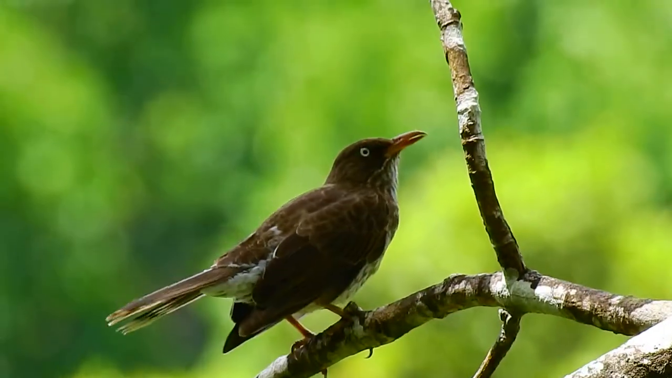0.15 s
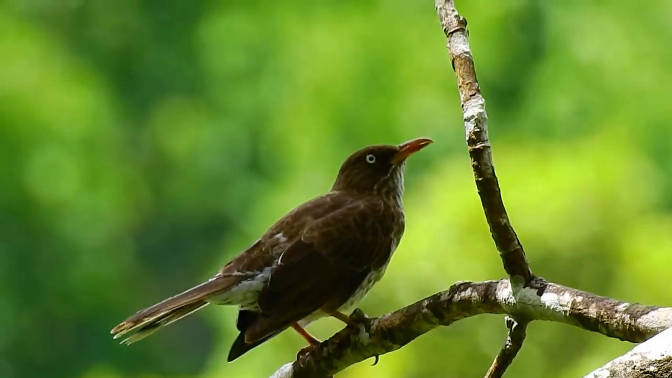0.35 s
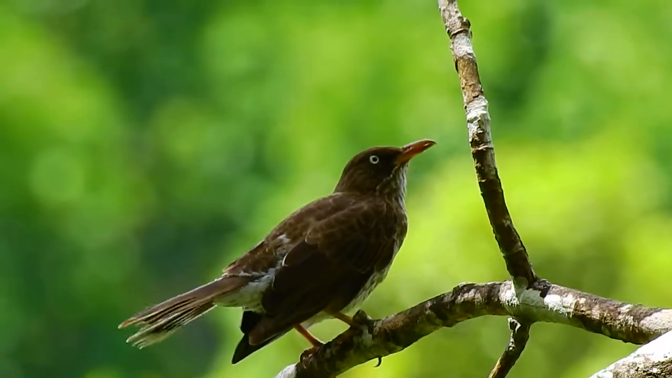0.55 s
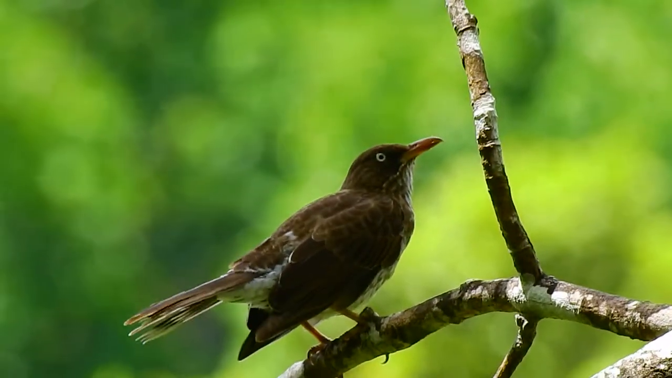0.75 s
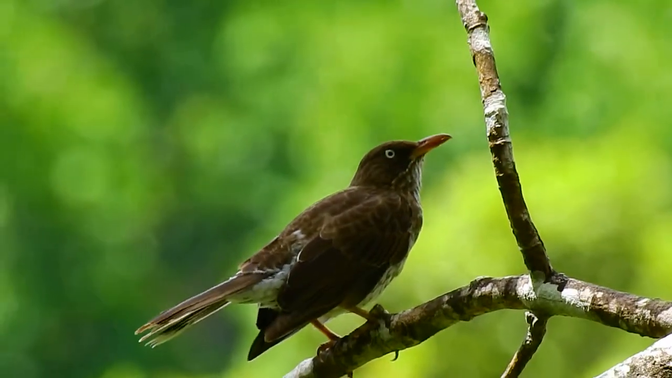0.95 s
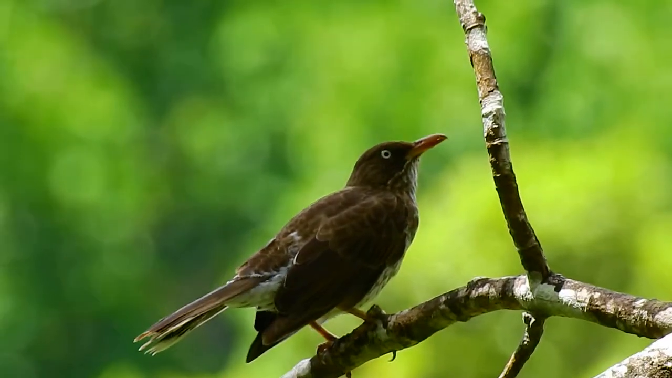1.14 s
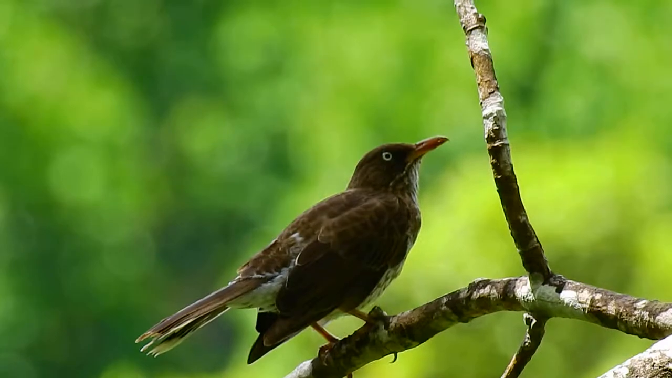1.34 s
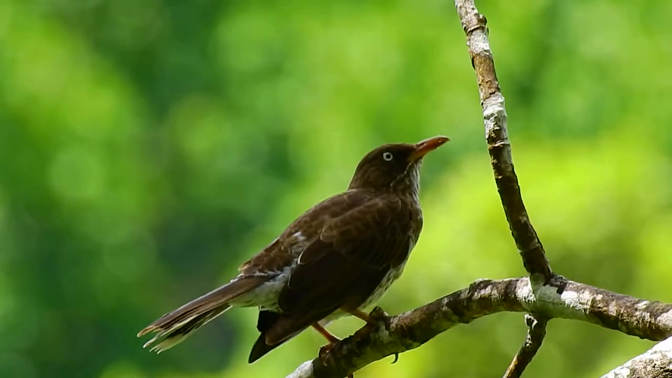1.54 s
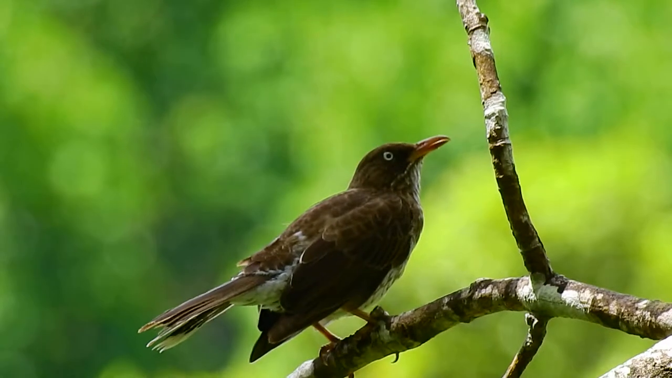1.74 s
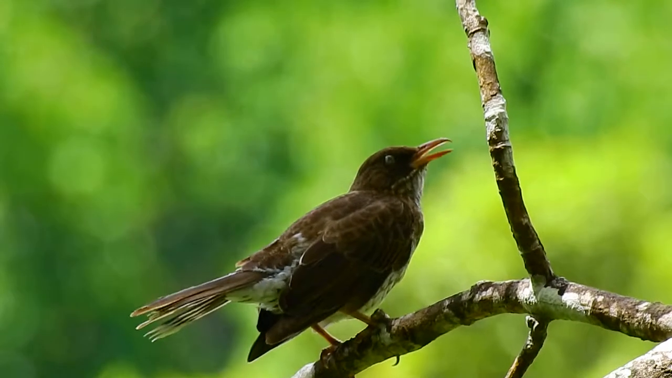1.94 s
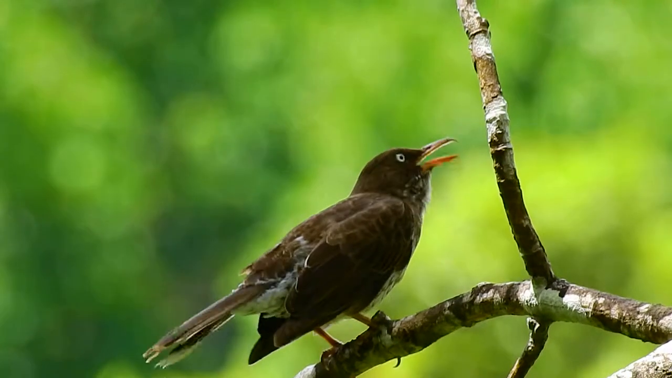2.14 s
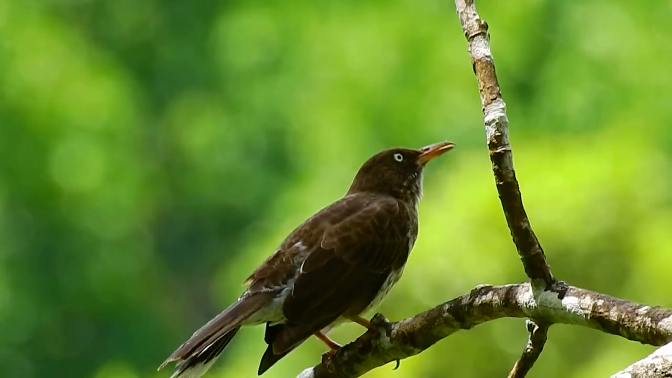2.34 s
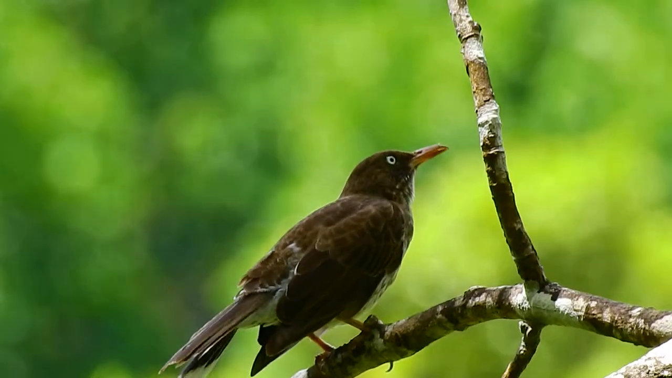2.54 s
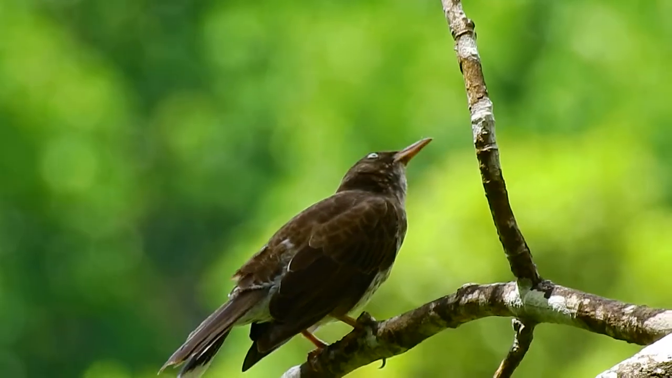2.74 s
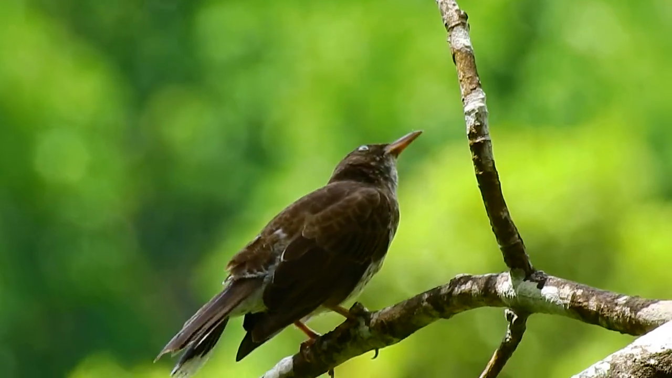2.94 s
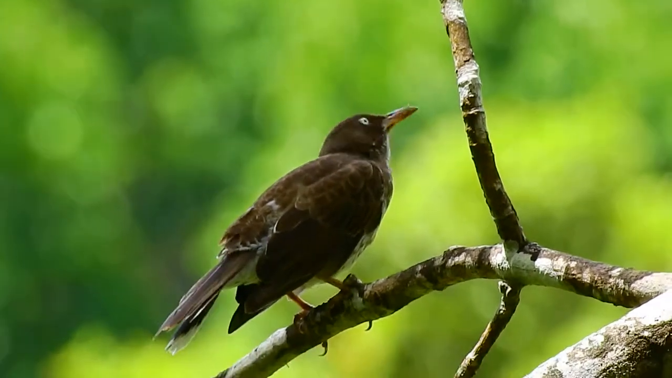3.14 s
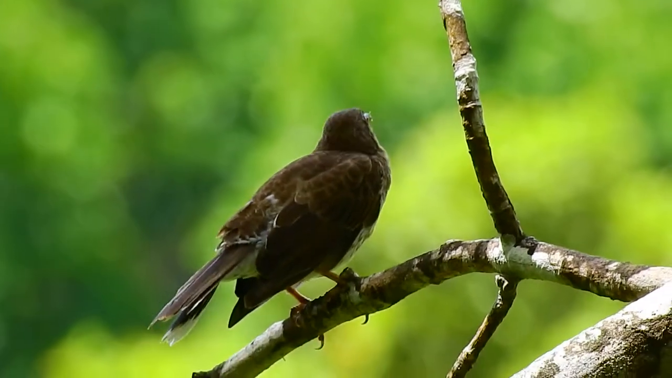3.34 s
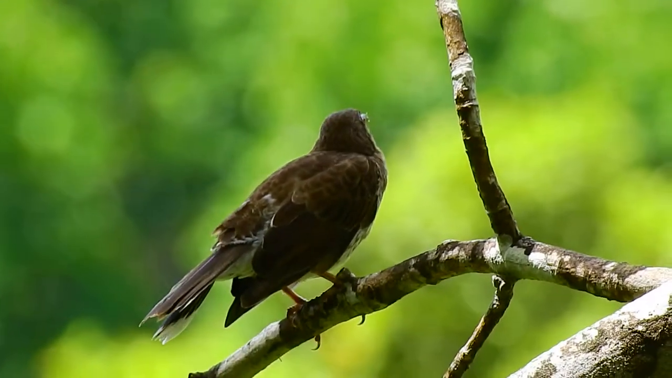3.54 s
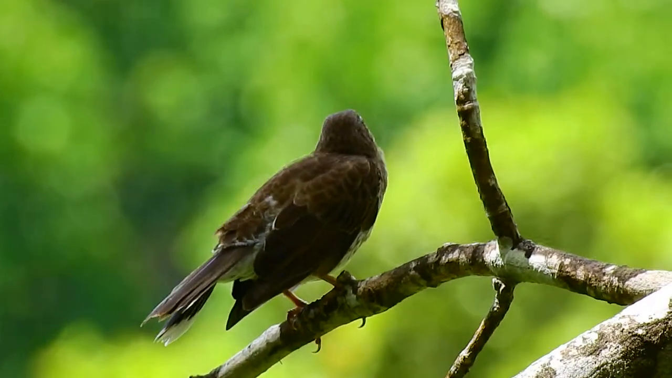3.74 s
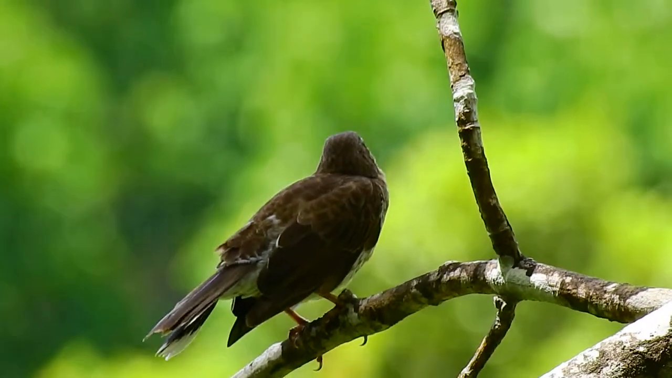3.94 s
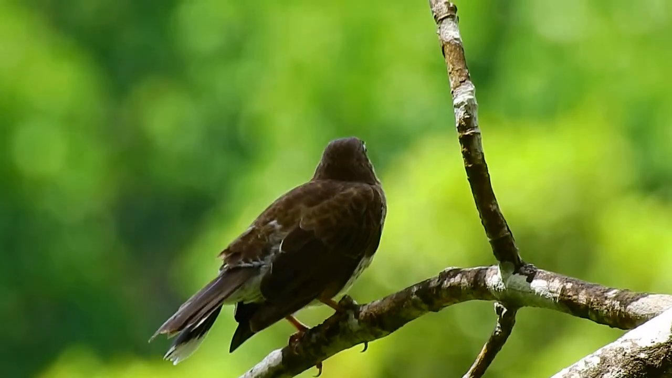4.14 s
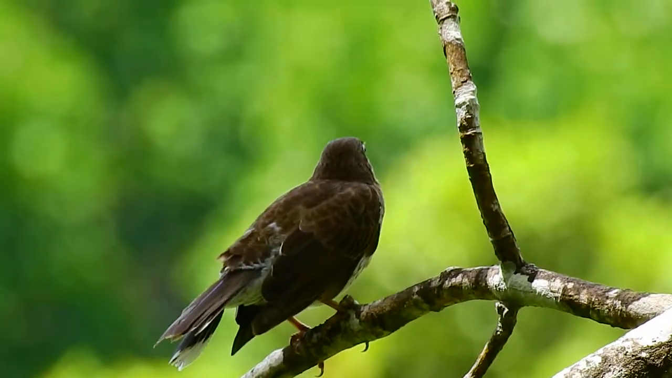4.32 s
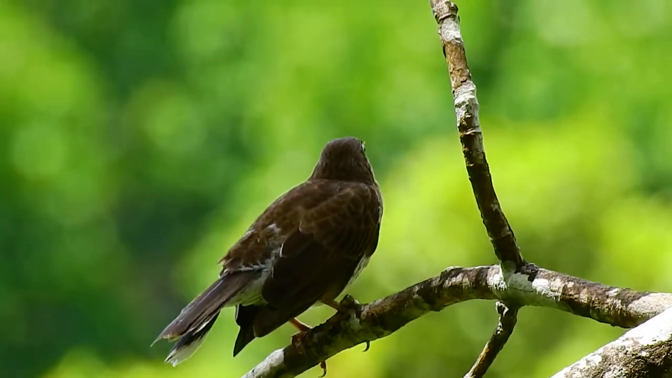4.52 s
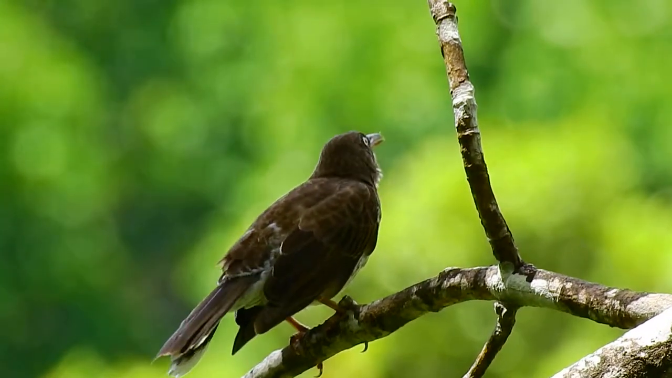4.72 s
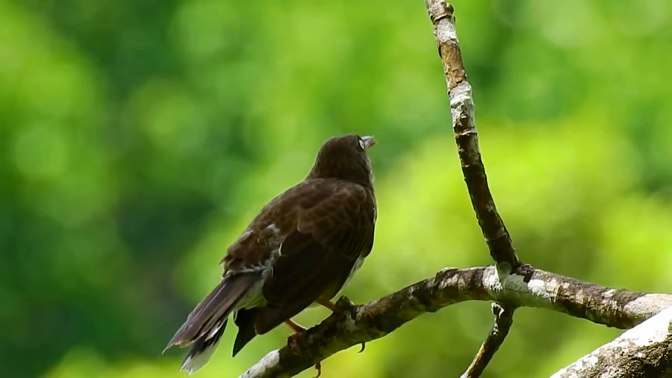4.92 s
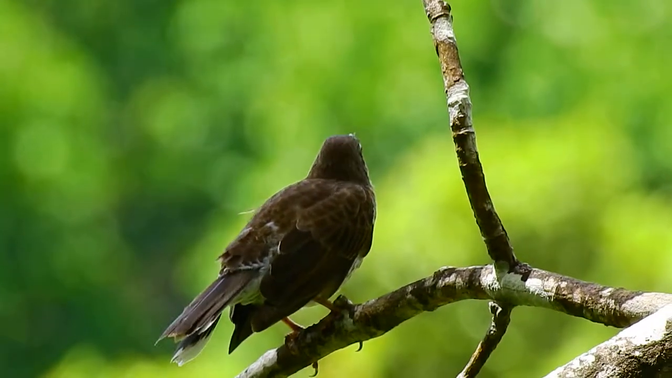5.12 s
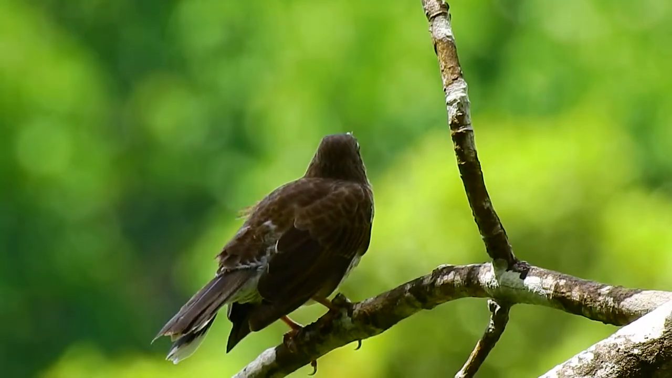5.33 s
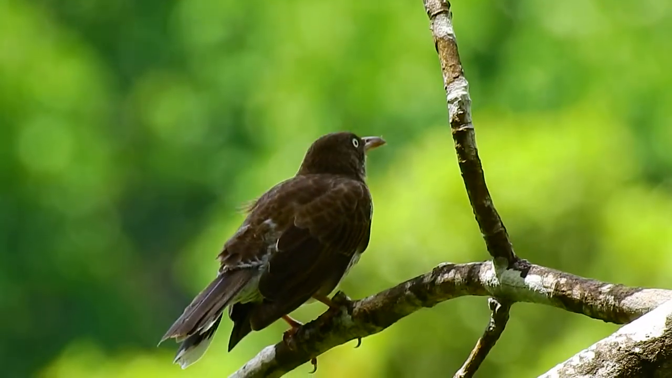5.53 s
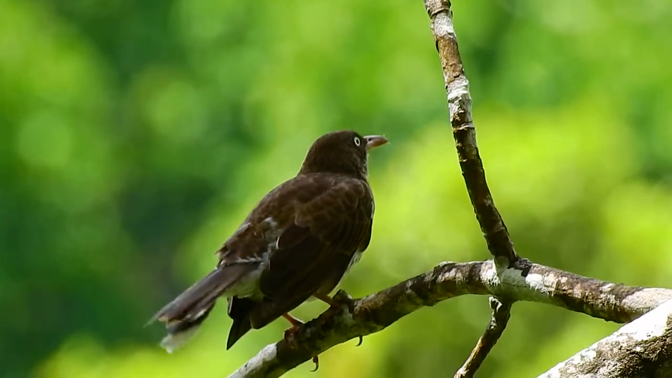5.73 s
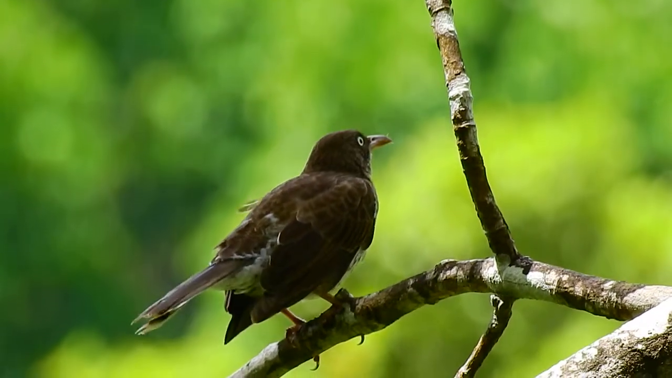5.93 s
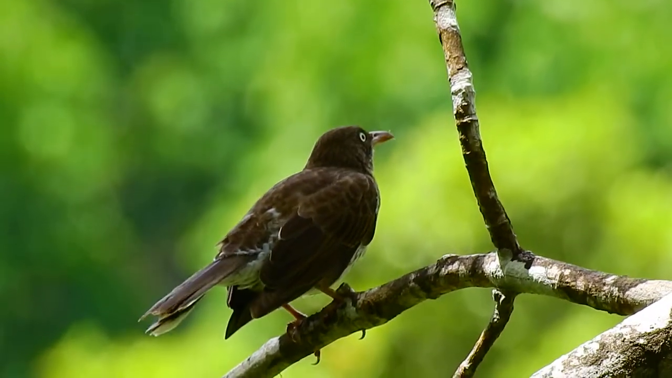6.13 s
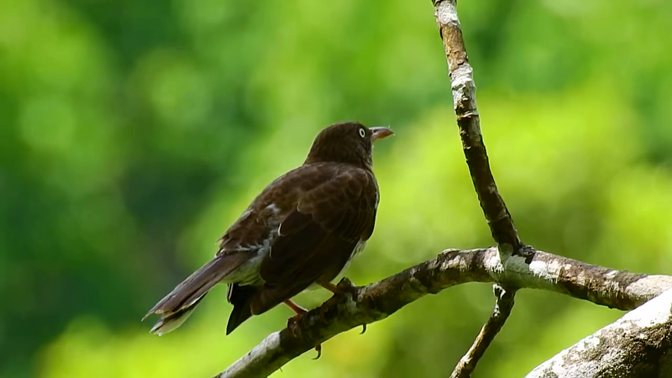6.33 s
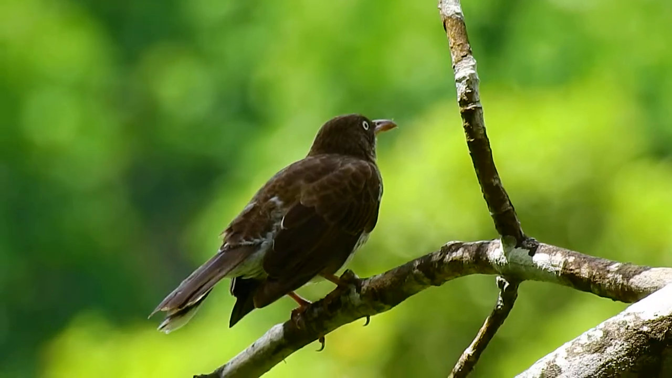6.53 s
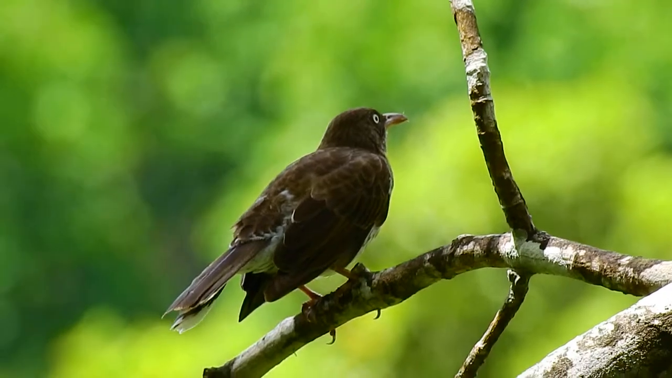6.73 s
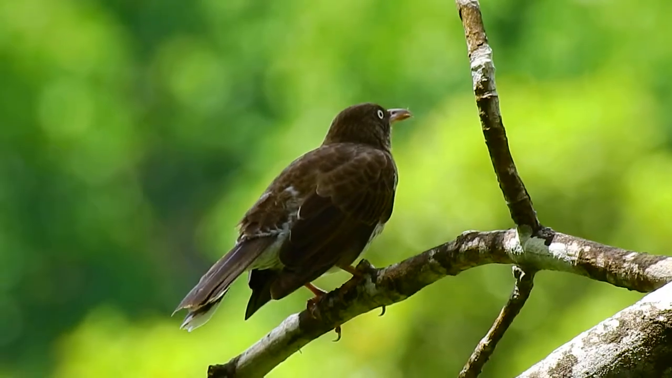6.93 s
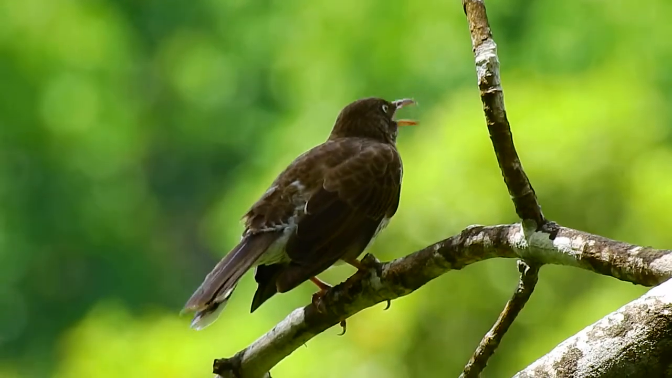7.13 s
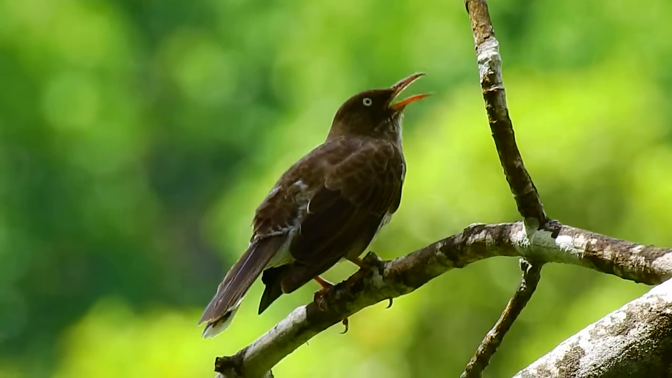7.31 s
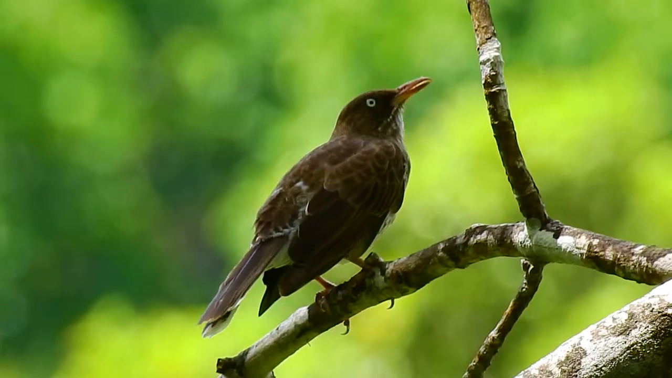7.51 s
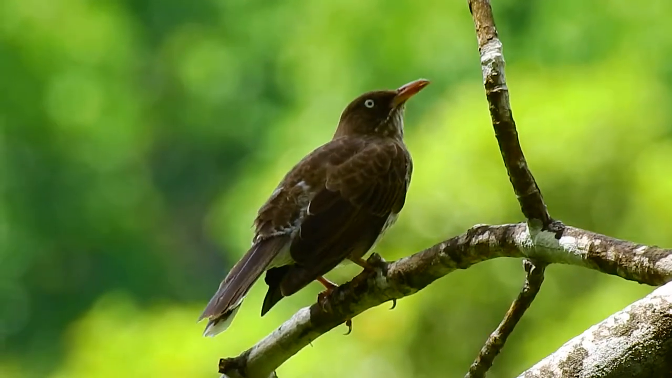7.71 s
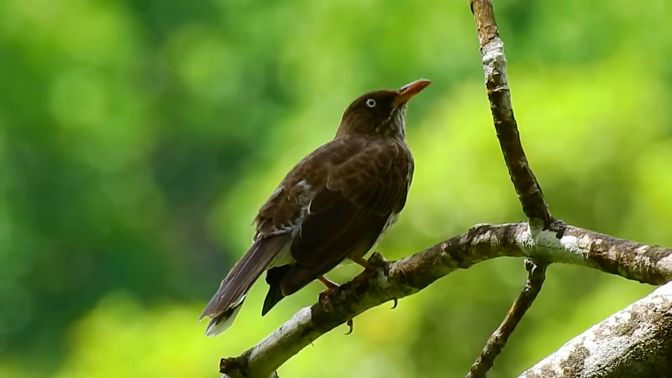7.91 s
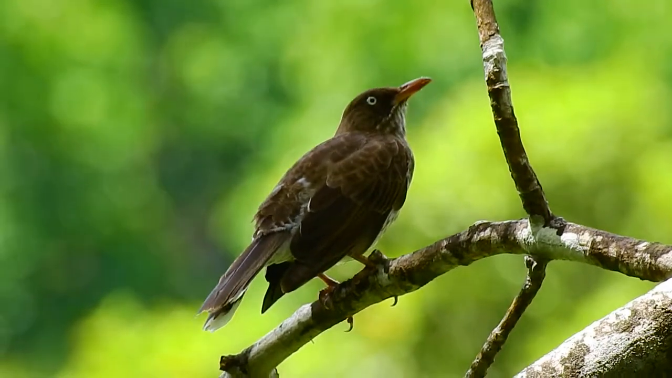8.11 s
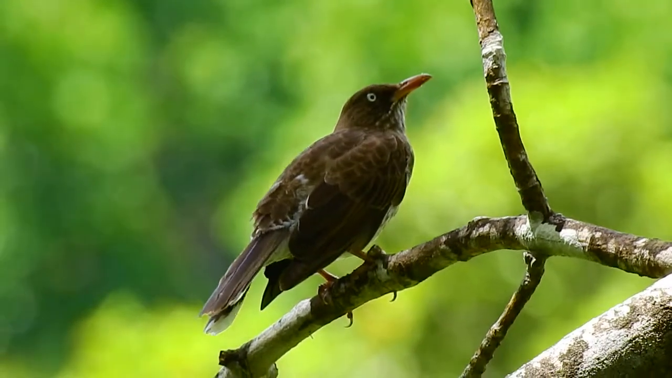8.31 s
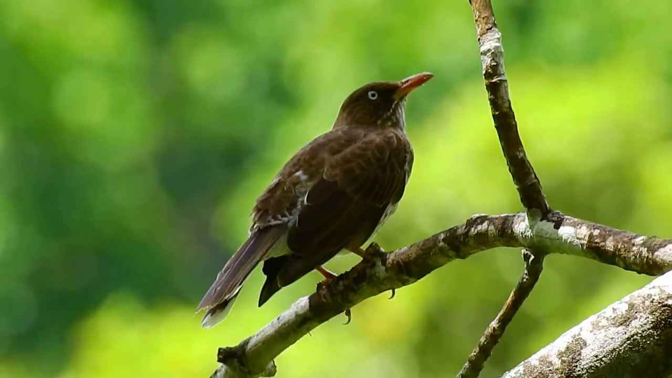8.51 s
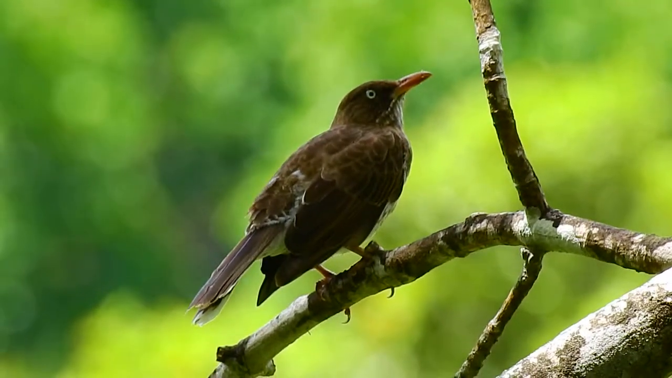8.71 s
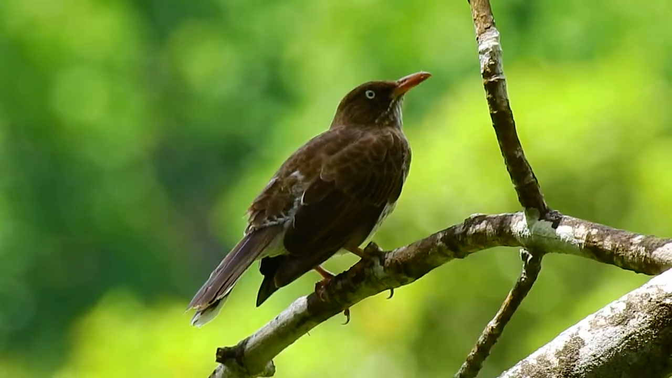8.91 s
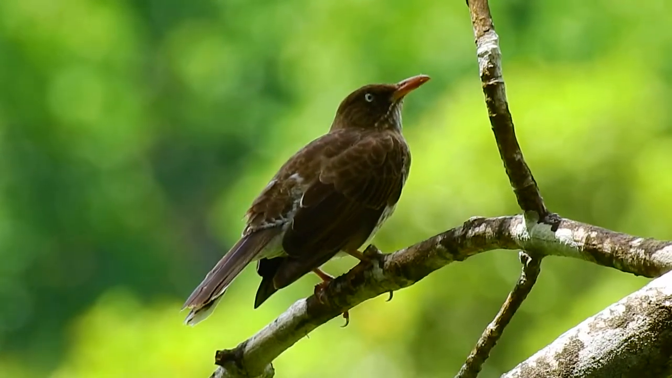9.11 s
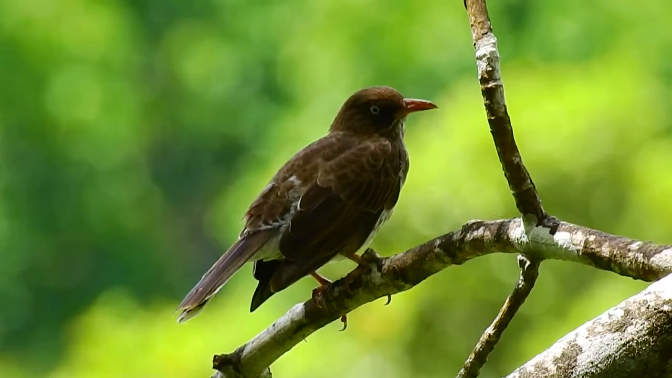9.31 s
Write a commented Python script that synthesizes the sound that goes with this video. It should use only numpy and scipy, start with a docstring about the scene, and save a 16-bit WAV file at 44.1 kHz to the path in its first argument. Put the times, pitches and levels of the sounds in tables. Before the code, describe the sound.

In a forest with a soft rush of air and a light breeze, a brief bird note and a raspy hiss open the scene, followed by one close knock. A nearby bird then sings three loud, quick phrases of descending whistles that echo lightly among the trees. Farther birds twitter, chip and whistle thinly in between. A small bird gives a short chirr, and two soft bumps come last.

```python
"""In a forest, a thrasher on a branch sings loud phrases of falling whistles, gliding tones with a hiss of breath.
Trunks and foliage, modelled as decaying noise tails, smear each note into an echo.
Other birds, also gliding tones, give sharp chips, thin whistles, far calls, and a grainy chirr with a closing peep.
Shaped noise makes a short raspy hiss at the opening, then a high twittering chorus in bouts, over forest and breeze.
Decaying sines make one close knock and soft bumps; short noise bursts make small ticks."""
import sys
import numpy as np
from scipy import signal
from scipy.fft import rfft, irfft, next_fast_len
from scipy.io import wavfile
from scipy.ndimage import uniform_filter1d, map_coordinates

SR = 44100
rng = np.random.default_rng(int(sys.argv[2]) if len(sys.argv) > 2 else 0)


def write(x):
    x = np.atleast_2d(x).T
    wavfile.write(sys.argv[1], SR, np.round(np.clip(x, -1, 1) * 32767).astype(np.int16))


N = 412776

# steady air among the trees, spectrum: pitch_hz, relative_db
FOREST_SPECTRUM = [(25, -26), (50, -17), (95, -15), (160, -2.5), (240, -0.5), (400, -4), (520, -3.5),
                   (1000, -7.5), (1700, -11), (3900, -13), (6400, -7.5), (7500, -17), (15500, -36.5)]
# breeze strength before gusts and a common trim: time_s, relative_db
BREEZE_LEVEL = [(0, -52), (.6, -63.5), (1.65, -62.5), (1.8, -76), (6.08, -84), (6.15, -59), (8.2, -60),
                (8.9, -76), (9.36, -54)]
# likeness of left and right in diffuse noise: pitch_hz, coherence (0 to 1)
COHERENCE = [(60, 0.28), (150, 0.76), (900, 0.86), (2400, 0.51), (6000, 0.54), (15000, 0)]

# high twittering noise, spectrum: pitch_hz, relative_db
TWITTER_SPECTRUM = [(3000, -34), (4000, -17), (4600, -9), (5300, -5.5), (6550, 7.5), (7240, 1.5),
                    (8000, -7), (10300, -32), (15000, -74)]
# a short raspy hiss at the opening, then bouts of the chorus, before a common gain:
# start_s, hold_s, relative_db
HISS_AND_BOUTS = [(0, 0.0066, -36.5), (1.155, 0.53, -41.5), (3.927, 0.65, -42), (6.996, 0.6, -42),
                  (7.82, 0.1, -41.5)]
RISE_DB_PER_S, FALL_DB_PER_S = 28.5, 65  # swelling and fading of the hiss and the bouts
LULL_DB = -58.5  # level in between, on the same scale

# the thrasher's notes, before throat radiation: start_s, length_s, held_hz, last_hz, scoop_hz (rise up to
# held_hz), hold_share (before the slide), peak_share (at the loudest), bend (how early the slide settles),
# level_db, overtone_db
SONG_NOTES = [ (0, 0.05, 2340, 2220, -3, 0.13, 0.51, 1.06, -18.5, 12),
              (0, 0.082, 2787, 2690, 0, 0.081, 0.073, 1.5, -27, -3),
              (2.158, 0.068, 5360, 3715, 326, .38, 0.62, 1.17, -11.5, 0),
              (2.158, .043, 3934, 3950, 0, 0.15, .38, 1.8, -32, 29),
              (2.239, 0.057, 3250, 2262, 7, .1, 0.69, 3.35, -11.5, 7),
              (2.334, 0.087, 2850, 1133, 2, .2, 0.21, 3.15, -23, -2),
              (4.739, 0.038, 3625, 2325, 17, 0.021, 0.59, 4.7, -25, 17),
              (4.742, 0.096, 2150, 1540, 0, 0.018, 0.61, 8.1, -19.5, 10),
              (4.86, 0.028, 1490, 1110, 4, 0.16, 0.29, 0.56, -17.5, -4),
              (7.24, 0.14, 6170, 3950, 0, 0.026, 0.33, 9.9, -38, 18),
              (7.286, 0.074, 5246, 4370, 33, 0.32, 0.45, 2.2, -12.5, 0.5),
              (7.364, 0.071, 3290, 2104, 0, 0.028, 0.15, 9.3, -24, -4),
              (7.398, 0.0532, 3563, 3350, 347, 0.787, 0.67, 1, -17.5, 13),
              (7.455, .05, 2996, 1164, 2, 0.052, 0.11, 3.6, -28, -2)]
# harmonics of every bird's tone, before each voice's own offset: multiple, relative_db
HARMONICS = [(2, -34), (3, -62)]
# air hiss in the open beak, spectrum: pitch_hz, relative_db
BEAK_HISS = [(3500, -14), (6600, 12.5), (9500, -19), (12000, -44), (16000, -39)]
# how much of the song trunks and leaves throw back: pitch_hz, relative_db
SCATTERING = [(1500, -3.5), (2500, -5), (4500, 0.5), (9000, 2.5)]
THROAT_HZ = 2270  # lower pitches radiate poorly from the throat
SONG_EDGE_DB = 12  # how much softer a note's ends are
SWELL_SHAPE = 0.87  # exponent of a slur's swell, for every bird but the thin whistler

# far calls, deep among the trees: start_s, length_s, first_hz, last_hz, level_db
FAR_CALLS = [(0, 0.038, 9350, 6700, -43), (0.61, 0.049, 10400, 8450, -50.5), (4.1, 0.049, 5150, 4380, -43),
             (4.197, 0.061, 5360, 3330, -38), (4.27, 0.088, 5110, 4490, -39),
             (4.475, 0.042, 5100, 4240, -38), (4.575, 0.064, 4550, 3800, -46),
             (4.68, .06, 4190, 3430, -44.5), (5.61, 0.038, 4440, 5360, -49),
             (5.656, 0.084, 5300, 4330, -47), (6.24, 0.086, 4880, 4260, -53),
             (7.83, 0.099, 8150, 7630, -38.5), (8.07, 0.053, 3140, 3020, -54),
             (8.696, 0.014, 9700, 4740, -34), (8.98, 0.058, 9070, 5110, -36),
             (9.14, 0.052, 10140, 5400, -40.5), (2.61, .11, 606, 797, -46.5), (2.71, 0.13, 819, 629, -52.5)]
# one high slur leads each full bout of the chorus: start_s, length_s, level_db
LEAD_SLURS = [(1.079, 0.13, -29.5), (3.917, 0.11, -31.5), (6.937, 0.2, -31.5)]
# pitch of those slurs: first_hz, last_hz
LEAD_PITCH = (7040, 6460)
FAR_EDGE_DB = 10.5  # softer ends of a far call

# resonances of the knock: delay_s, pitch_hz, level_db, t60_s
KNOCK_MODES = [(0, 869, -26, 0.044), (0, 530, -26.5, 0.043), (0, 2570, -27.5, 0.015), (0, 1150, -36, .04),
               (.005, 197, -6.5, 0.025)]
KNOCK_START_S = 1.159
# dry ticks before their spectrum is shaped: start_s, level_db
TICK_TIMES = [(1.1584, -30), (2.475, -35.5), (2.493, -40), (5.4832, -36)]
# soft bumps: start_s, pitch_hz, level_db
SOFT_BUMPS = [(9.209, 134, -19), (9.325, 150, -19)]

# two long thin whistles of a neighbour, one curve each: time_s, pitch_hz, level_db
THIN_WHISTLES = [
    [(1.205, 4900, -52), (1.24, 4860, -46), (1.3, 4615, -61), (1.462, 4590, -47), (1.558, 4624, -62),
     (1.7, 4630, -49.5), (1.8, 4606, -52), (2.058, 4670, -46), (2.125, 4570, -72)],
    [(2.775, 4910, -38), (2.81, 4710, -45), (2.86, 4650, -62), (2.94, 4540, -63), (2.955, 4620, -45.5),
     (3.05, 4660, -53), (3.08, 4740, -41), (3.15, 4823, -47), (3.205, 4570, -46), (3.46, 4495, -54)],
]
# chips from the canopy, sagging and then plunging: start_s, length_s, first_hz, last_hz, level_db
CANOPY_CHIPS = [(2.695, 0.03, 8400, 7880, -38), (2.696, 0.026, 9460, 7680, -45),
                (2.706, 0.02, 8080, 5440, -26), (5.121, 0.019, 9050, 7680, -34.5),
                (5.149, 0.016, 8750, 4900, -27.5)]
CHIP_BEND, CHIP_PEAK, CHIP_EDGE_DB = -1.51, 0.72, 8  # late plunge; share at the loudest; softer ends
CHIP_ECHO_HZ = 5500  # leaves throw back mostly what lies above this

# chirrs of a small bird, pitches of each slur: start_s, length_s, first_hz, last_hz, level_db
CHIRR_RUNS = [(8.065, .062, 7520, 5320, -28.5), (8.136, .054, 8450, 5740, -32)]
# the note that closes the chirr: start_s, length_s, first_hz, last_hz, level_db
CLOSING_PEEP = (8.243, .024, 6550, 6050, -33.5)
CHIRR_RATE_HZ, CHIRR_SLUR_S = 110, 0.0056  # slurs a second; length of each

TOP_HZ = 15700  # upper band limit


def amp(db):
    """Logarithmic level: decibels become a gain in amplitude."""
    return 10 ** (np.asarray(db) / 20)


def unit(x):
    """Normalization: scale to a root mean square of 1."""
    return x / np.sqrt(np.mean(x ** 2) + 1e-20)


def along(points, hz):
    """Spectral interpolation: (pitch_hz, value) points joined on a logarithmic axis."""
    f, v = np.transpose(points)
    return np.interp(np.log(hz + 1), np.log(f + 1), v)


def curve(rows):
    """Linear interpolation: one value per sample from (time_s, value) rows."""
    return np.interp(np.arange(N) / SR, *np.transpose(rows))


def wobble(rate, size=N):
    """Band-limited fluctuation: a smooth curve through random knots, rate knots a second."""
    knots = rng.standard_normal(int(size * rate / SR) + 4)
    return map_coordinates(knots, [np.arange(size) * rate / SR])


def filtered(x, response):
    """Linear filtering: the spectrum of x times a response of frequency."""
    m = next_fast_len(N + SR // 2)
    return irfft(rfft(x, m) * response(np.fft.rfftfreq(m, 1 / SR)), m)[..., :N]


def highpass(x, corner_hz, order):
    """High-pass response: what lies below the corner is weakened, more steeply with order."""
    return filtered(x, lambda hz: hz ** order / np.hypot(hz ** order, corner_hz ** order))


def add(track, start_s, sound):
    """Superposition: mix a sound into a track at its start."""
    part = track[max(0, round(start_s * SR)):][:len(sound)]
    part += sound[:len(part)]


def rush(spectrum, coherence, patchy_db):
    """Diffuse noise: shaped stereo of rms 1, partly coherent, with random gain patches in time and frequency."""
    z = signal.stft(rng.standard_normal((2, N)), nperseg=512)[2]
    field = uniform_filter1d(rng.standard_normal(z.shape[1:]), size=6, axis=0)
    field = uniform_filter1d(field, size=8, axis=1)
    pair = signal.istft(z * amp(patchy_db * unit(field)))[1][:, :N]

    def response(hz):
        # the angle divides the energy between mid and side
        angle = np.arccos(np.clip(along(coherence, hz), -1, 1)) / 2
        return amp(along(spectrum, hz)) * [np.cos(angle), np.sin(angle)]

    mid, side = filtered(pair, response)
    return unit(np.array([mid + side, mid - side]))


def slur(start_s, length_s, first_hz, last_hz, level_db, edge_db, bend=0.16, hold=0, peak=0.35, scoop_hz=0):
    """Frequency glide: a note scoops up while held, slides (bend > 0 early, < 0 late), and swells and fades."""
    u = np.linspace(0, 1, 41)
    hold, peak = np.clip(hold, 1e-6, .9), np.clip(peak, .02, .98)
    slide = np.expm1(-bend * np.clip((u - hold) / (1 - hold), 0, 1)) / np.expm1(-bend)
    flat_hz = scoop_hz * np.clip(1 - (u / hold) ** 2, 0, 1)
    pitch_hz = first_hz + (last_hz - first_hz) * slide - flat_hz
    off_peak = np.maximum((peak - u) / peak, (u - peak) / (1 - peak))
    return np.transpose([start_s + length_s * u, pitch_hz, level_db - edge_db * off_peak ** SWELL_SHAPE])


def syrinx(notes, waver, flutter_db, overtone_db):
    """Frequency modulation: nearly pure gliding tones; notes overlap where both sides of the syrinx sound."""
    out = np.zeros(N)
    for note in notes:
        s, hz, db = np.transpose(note)
        s = np.sort(s)
        t = np.arange(s[0], s[-1] + .002, 1 / SR)
        pitch_hz = np.interp(t, s, hz) * (1 + waver * wobble(299, len(t)))
        phase = 2 * np.pi * np.cumsum(pitch_hz) / SR
        gate = np.clip(np.minimum(t - t[0], t[-1] - t) / .003, 0, 1)  # 3 ms edges
        tone = np.sin(phase)
        for order, relative_db in HARMONICS:
            order = round(order)
            if order * hz.max() < SR / 2:
                tone += amp(relative_db + overtone_db) * np.sin(order * phase)
        level_db = np.interp(t, s, db) + flutter_db * wobble(153.4, len(t))
        add(out, s[0], np.sqrt(2) * gate * amp(level_db) * tone)
    return out


def trees(x, build, t60, late_db, late_t60, alike):
    """Reverberation: echoes build up from nearby trunks and decay; the deeper forest rings on (times in s)."""
    t = np.arange(SR) / SR
    decay = (1 - np.exp(-t / build)) * (amp(-60 * t / t60) + amp(late_db - 60 * t / late_t60))
    tail = rng.standard_normal((2, SR)) * decay
    mid, side = signal.fftconvolve(x[None], tail / np.linalg.norm(tail[0]), axes=1)[:, :N]
    angle = np.arccos(np.clip(alike, -1, 1)) / 2
    return np.cos(angle) * mid + np.sin(angle) * np.array([side, -side])


def forest():
    """Broadband turbulence: the steady rush of the woods, with a light breeze rumbling on the microphone."""
    air = amp(-47.5) * rush(FOREST_SPECTRUM, COHERENCE, patchy_db=2.0)
    breeze_spectrum = [(20, -26), (55, 8.5), (90, 6), (200, 5.5), (600, -75)]  # pitch_hz, relative_db
    breeze = rush(breeze_spectrum, COHERENCE, patchy_db=-6.0)
    gusts_db = 3.5 * wobble(9)
    return air + amp(curve(BREEZE_LEVEL) - 4.5 + gusts_db) * breeze


def hiss_and_chorus():
    """Incoherent summation: after a short raspy hiss, many distant high voices merge into a twitter in bouts."""
    t = np.arange(N) / SR
    swells = []
    for start_s, hold_s, db in HISS_AND_BOUTS:
        rise_db = RISE_DB_PER_S * np.maximum(start_s - t, 0)
        fall_db = FALL_DB_PER_S * np.maximum(t - start_s - hold_s, 0)
        swells.append(db - rise_db - fall_db)
    level_db = np.maximum(np.max(swells, axis=0), LULL_DB)  # a thin twitter lasts through the lulls
    twitter = rush(TWITTER_SPECTRUM, [(6000, 0.047)], patchy_db=1.5)
    return amp(level_db + 4.0 + 1.54 * wobble(18)) * twitter * amp([[-.8], [.8]])


def thrasher():
    """Near field: the close singer is mostly direct sound; air hisses through the beak with each note."""
    voice = np.zeros(N)
    for start_s, length_s, held_hz, last_hz, scoop_hz, hold, peak, bend, db, overtone_db in SONG_NOTES:
        note = slur(start_s, length_s, held_hz, last_hz, db, SONG_EDGE_DB, bend, hold, peak, scoop_hz)
        voice += syrinx([note], waver=0.0079, flutter_db=2.2, overtone_db=overtone_db)
    voice = highpass(voice, THROAT_HZ, order=4)
    effort = np.sqrt(np.abs(uniform_filter1d(voice ** 2, size=220)))  # 5 ms rms envelope
    voice = voice + amp(-26) * effort * rush(BEAK_HISS, COHERENCE, patchy_db=3)[0]
    scattered = filtered(voice, lambda hz: amp(along(SCATTERING, hz)))
    return voice + trees(scattered, build=0.01, t60=0.34, late_db=-12, late_t60=1, alike=0.82)


def far_birds():
    """Direct-to-reverberant ratio: short slurs swell and fade, heard mostly by their echoes."""
    leads = [(start_s, length_s, *LEAD_PITCH, db) for start_s, length_s, db in LEAD_SLURS]
    notes = [slur(*row, FAR_EDGE_DB) for row in FAR_CALLS + leads]
    calls = syrinx(notes, waver=0.0262, flutter_db=4.0, overtone_db=-7)
    # leaves scatter the highest notes, so mainly the lower ones arrive directly
    direct = filtered(calls, lambda hz: .7 / (1 + (hz / 5500) ** 6))
    echo = trees(calls, build=0.004, t60=0.5, late_db=-17, late_t60=1, alike=.2)
    return (direct + echo) * amp([[-.7], [.7]])


def ring(hz, db, t60):
    """Damped resonance: a sine with a quick onset and exponential decay."""
    t = np.arange(SR // 4) / SR
    return amp(db - 60 * t / t60) * np.sin(2 * np.pi * hz * t) * (1 - np.exp(-t * hz)) ** 2


def knocks():
    """Impact excitation: a close knock with a low thud and soft bumps ring as damped modes; ticks are noise."""
    body, ticks, t = np.zeros(N), np.zeros(N), np.arange(SR // 4) / SR
    for delay_s, hz, db, t60 in KNOCK_MODES:
        add(body, KNOCK_START_S + delay_s, ring(hz, db, t60))
    for start_s, hz, db in SOFT_BUMPS:
        add(body, start_s, ring(hz, db, t60=0.032))
    for start_s, db in TICK_TIMES:
        add(ticks, start_s, amp(db - 60 * t / 0.016) * rng.standard_normal(len(t)))
    # pitch_hz, relative_db
    tick_spectrum = [(1000, -5), (3500, 7.5), (5500, 14.0), (8000, 8.5), (15000, -37)]
    ticks = filtered(ticks, lambda hz: amp(along(tick_spectrum, hz)))
    dry_hits = body + ticks
    echo = trees(dry_hits, build=0.0035, t60=0.057, late_db=-28, late_t60=0.54, alike=0.45)
    return dry_hits + amp(-4.0) * echo


def neighbours():
    """Scattering by foliage: canopy chips and a thin whistle in uneven puffs, each with its own echo."""
    puffs = .65 + .35 * np.tanh(2 * wobble(28))
    thin = puffs * syrinx(THIN_WHISTLES, waver=0.0032, flutter_db=4.5, overtone_db=-13)
    thin_echo = amp(4.5) * trees(thin, build=0.0084, t60=0.66, late_db=-5, late_t60=1, alike=0.27)
    chip_notes = [slur(*row, CHIP_EDGE_DB, CHIP_BEND, peak=CHIP_PEAK) for row in CANOPY_CHIPS]
    chips = syrinx(chip_notes, waver=0.011, flutter_db=5.0, overtone_db=-18)
    scattered = highpass(chips, CHIP_ECHO_HZ, order=8)
    chip_echo = trees(scattered, build=0.0053, t60=0.41, late_db=-6.0, late_t60=0.58, alike=0.055)
    return chips + thin + amp(10.5) * chip_echo * amp([[-.9], [.9]]) + thin_echo


def small_bird():
    """Rapid repetition: quick uneven runs of tiny slurs fuse into a grainy chirr, and one peep closes it."""
    notes = [slur(*CLOSING_PEEP, edge_db=20)]
    for start_s, length_s, first_hz, last_hz, db in CHIRR_RUNS:
        count = max(1, round(length_s * CHIRR_RATE_HZ))
        for k, (late, sharp, loud) in enumerate(rng.standard_normal((count, 3))):
            slur_s = start_s + (k + 0.2 * late) / CHIRR_RATE_HZ
            pitch = 1 + 0.052 * sharp
            notes.append(slur(slur_s, CHIRR_SLUR_S, first_hz * pitch, last_hz * pitch, db + 2 * loud, edge_db=15))
    voice = syrinx(notes, waver=0.014, flutter_db=1, overtone_db=-6)
    echo = trees(voice, build=.003, t60=0.21, late_db=1, late_t60=1.0, alike=0.17)
    return voice * amp([[-.7], [.7]]) + amp(3) * echo


def scene():
    """Superposition: the pressures of all sources add."""
    return forest() + hiss_and_chorus() + thrasher() + far_birds() + knocks() + neighbours() + small_bird()


def record(dry):
    """Band limitation: nothing passes at or above the upper limit."""
    return filtered(dry, lambda hz: hz < TOP_HZ)


dry = scene()
out = record(dry)
write(out)
```